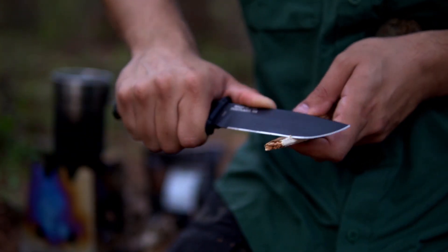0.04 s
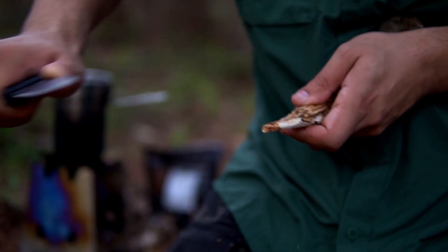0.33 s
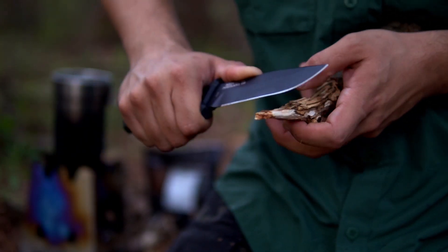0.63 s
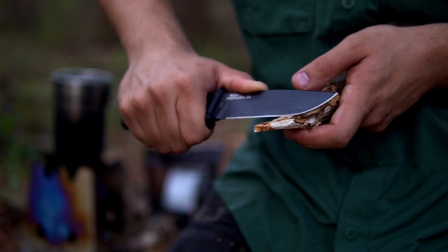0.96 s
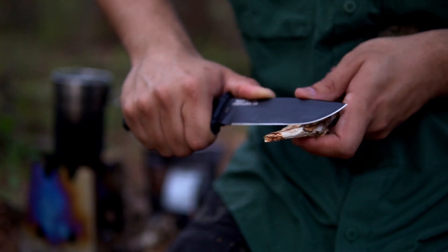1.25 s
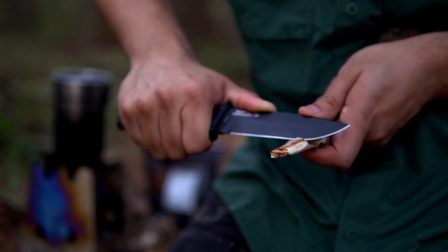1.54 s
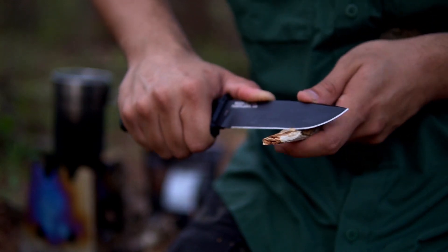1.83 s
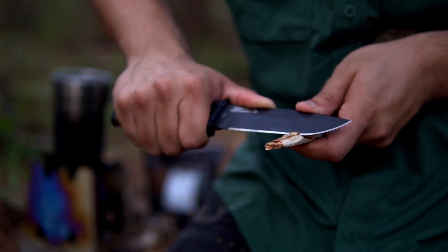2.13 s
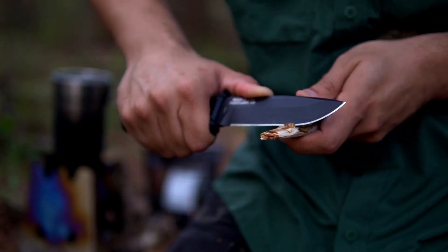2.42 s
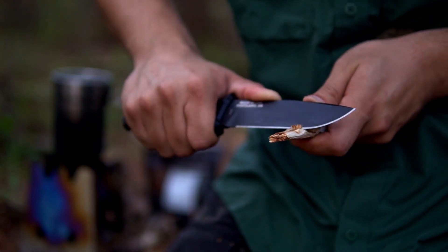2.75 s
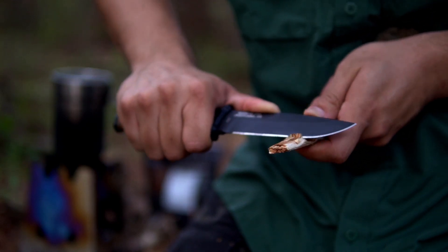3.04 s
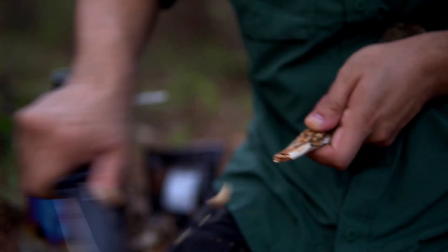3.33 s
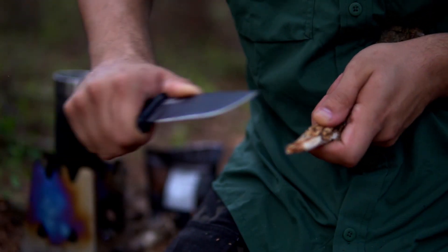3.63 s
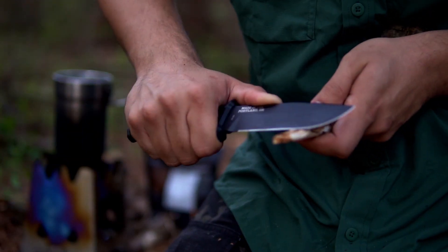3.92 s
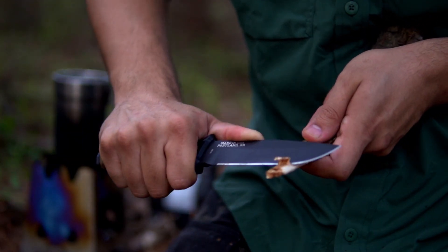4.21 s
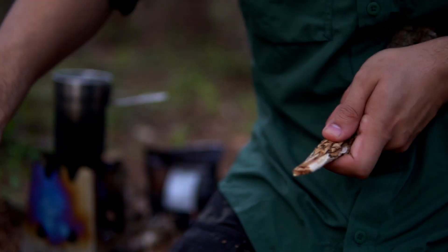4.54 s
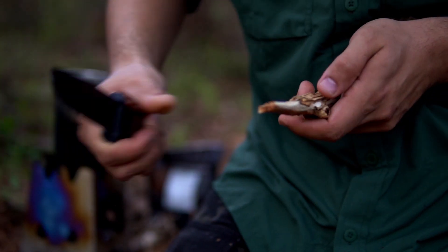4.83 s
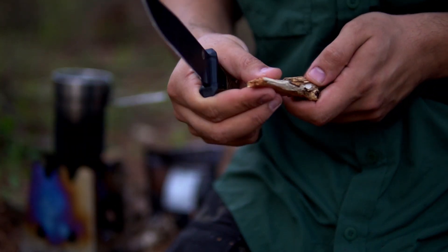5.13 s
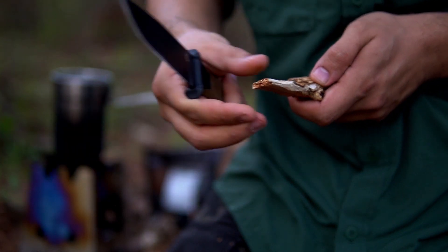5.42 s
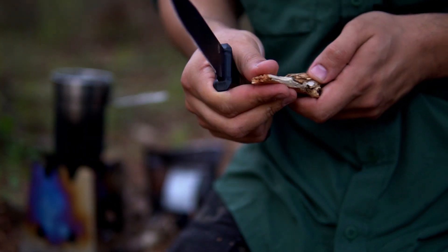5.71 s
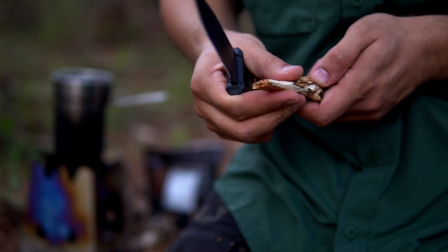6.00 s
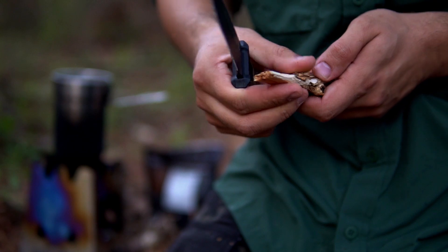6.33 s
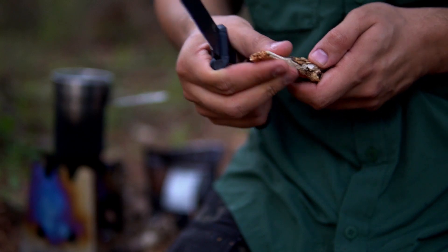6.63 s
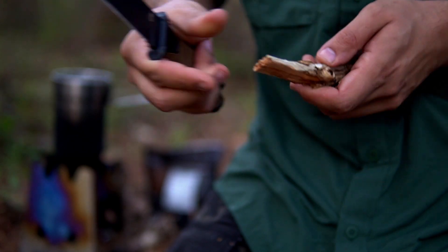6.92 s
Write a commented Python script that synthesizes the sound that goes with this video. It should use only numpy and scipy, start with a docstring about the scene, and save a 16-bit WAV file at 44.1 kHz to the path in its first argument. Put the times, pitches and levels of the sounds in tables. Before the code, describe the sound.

A knife whittles a dry stick up close, with sharp snaps, small creaks and scrapes, in quiet woodland with faint bird calls.

```python
"""A knife whittles a dry stick close by, over the low murmur of quiet woodland.
First the blade creaks, tears through the fibres and snaps off a splinter; a small bird calls thinly.
Then it slides over bark and wedges in with little squeaks and cracks. Three more cuts follow from 3.3 s,
the last the loudest, and loose chips tick down. From 5.2 s fingers rub the cut tip and the bird calls
once more. All along, the trees send back a soft echo."""
import sys
import numpy as np
from scipy import signal
from scipy.fft import rfft, irfft
from scipy.io import wavfile
from scipy.ndimage import uniform_filter1d

SR = 44100
rng = np.random.default_rng(int(sys.argv[2]) if len(sys.argv) > 2 else 0)


def to_wav(sig):
    """Store sig (one row per channel, or 1-D mono) as 16-bit WAV at the path in sys.argv[1].

    Samples outside -1..1 are clipped; the rate is SR.
    """
    pcm = np.clip(np.atleast_2d(sig), -1, 1) * 32767
    pcm = np.round(pcm).astype(np.int16)
    wavfile.write(sys.argv[1], SR, pcm.T)  # frames by channels


N = 306936

# Tone curves, how strong each frequency is next to the others: frequency_hz, gain_db
MURMUR_TONE = [(12, -54), (20, -30), (53, -4.5), (107, -3), (146, -7), (222, -12.5), (245, -13.5),
               (270, -12), (481, -9), (583, -12), (654, -11.5), (1210, -20), (1310, -22), (1780, -26.5),
               (2000, -28), (2600, -46.5), (4400, -120)]  # the far forest
AIR_TONE = [(1500, -20.5), (2300, -1.5), (2650, -0.5), (3050, 3), (3600, -0.5), (4400, 4), (5200, -4),
            (8000, -5.5), (15000, -10)]  # thin outdoor hiss
HISS_TONE = [(20, 23), (110, 1), (500, -11.5), (2500, -23), (5500, -2.5), (10000, 4), (16000, 3)]  # each channel's own noise
ECHO_TONE = [(200, -0.5), (900, 2.5), (1600, 0.5), (2400, -8), (3200, -7.5), (4500, -5), (7500, -2.5),
             (11000, -0.5), (15000, -0.5)]  # what the trees throw back
SKIN_TONE = [(2000, -12.5), (5500, -10), (6100, -6.5), (6700, 2), (7700, -9), (9500, -7.5), (11800, -9),
             (12500, -23), (15500, -32)]  # skin on wood
TIP_TONE = [(1500, -36), (2500, -20), (2900, -1), (3500, 2), (4000, -12), (4700, -9), (5600, -17.5),
            (12000, -31)]  # the splintered tip
BARK_TONE = [(1180, -29), (2000, -14), (2650, -18), (2820, -10), (3460, -8), (4250, 0.5), (4790, 3),
             (5540, -5), (6300, 0.5), (7110, -3.5), (8880, 1.5), (10500, -14.5), (15500, -33)]  # blade on bark
GRAIN_TONE = [(1180, -67), (2000, -14), (2500, -9.5), (2680, -1.5), (3180, 0.5), (3670, -3), (4630, 4.5),
              (5270, -4.5), (6360, 0), (7420, -8.5), (8290, -7), (11500, -13.5), (15500, -23.5)]  # bare wood
JOLT_TONE = [(60, -22.5), (200, 5.5), (450, 8), (800, -2.5), (1300, -9), (1700, -21), (4000, -25.5)]  # dull push of the wedged edge
SUPPLE_TONE = [(300, -58), (800, -30.5), (1400, -14.5), (1650, -15), (2020, -29.5), (2220, 0.5), (2480, -9),
               (2800, -21.5), (3800, -1), (4800, 1.5), (6000, -7), (7500, -9.5), (9800, -20.5),
               (11500, -14), (16000, -33.5)]  # bendy wood tearing
BRITTLE_TONE = [(200, -62.5), (1000, -12.5), (1600, -12), (2000, -28), (2600, 2), (3100, 4.5), (4000, -10),
                (5500, -13.5), (8000, -16), (12000, -22), (16000, -28)]  # brittle wood breaking
# How long the echo takes to fade by 60 dB: frequency_hz, fade_s
ECHO_FADE = [(200, 0.49), (1500, 0.36), (3500, 0.94), (8000, 0.8), (14000, 0.55)]

# Notes that ring in the wood, fading 60 dB in fade_s: pitch_hz, gain_db, fade_s
STICK_NOTES = [(466, -42, 0.018), (775, -10, 0.023), (903, 13.5, .022), (1040, -7, 0.013),
               (1413, -8, 0.055)]  # the stick, before the hand's grip lowers its pitch
SHAVING_NOTES = [(2282, 6, 0.039), (2520, -8, 0.029), (4580, 4, 0.016)]  # a bendy curl still attached
# Notes of the wedged blade: times_squeak_pitch, gain_db, fade_s
BLADE_NOTES = [(.49, -8, 0.0075), (.70, -16, 0.017), (.85, -8, .015), (1, 11, 0.013), (1.22, -28, .012),
               (1.85, -27, .005)]

# Thin bird calls: start_s, length_s, level_before_mix_db, opening_pitch_hz
BIRD_CALLS = [(.34, .15, -49.5, 8780), (0.842, .07, -60.5, 7650), (6.548, 0.074, -56, 8600)]
# Rubbing strokes: start_s, length_s, level_db, growth_db_per_s
FINGER_RUBS = [(5.219, .037, -46.5, 33), (6.667, .118, -45.5, -37), (6.91, .045, -52, -40)]
BARK_SLIDES = [(.62, 0.028, -40.5, 30), (.688, 0.05, -46.5, 115), (1.775, .05, -59.5, -38)]
WOOD_SCRAPES = [(1.047, 0.059, -41, -68)]
# Dry flakes flick off: time_s, level_db, rise_and_fall_s
BARK_FLAKES = [(0.605, -39, .0009), (0.999, -52, .0025), (5.694, -52, 0.0062), (5.732, -50, 0.0033),
               (5.771, -47.5, 0.0039), (6.165, -52, .0055), (6.759, -38, 0.0031), (6.776, -36.5, 0.0027),
               (6.9286, -38.5, .0018)]
# Light wooden ticks, as a chip lands or the splintered tip flicks off a finger: time_s, level_db
WOOD_TICKS = [(3.613, -45.5), (4.6095, -18.5), (4.7163, -41), (6.791, -36)]
# The edge wedges deeper: time_s, level_db, squeak_pitch_hz
BLADE_CREAKS = [(.128, -31.5, 4700), (1.524, -42, 6470), (1.5731, -38.5, 6550), (1.585, -44, 6700),
                (2.014, -52, 6000), (2.2583, -37, 5580), (2.26, -38.5, 7340), (3.098, -38, 6040),
                (3.1757, -34, 6380)]
# Lone cracks between cuts: time_s, level_db, knock_offset_db (an offset is added to level_db)
LONE_CRACKS = [(1.0301, -33, -14), (2.2598, -41, 11), (2.6958, -43, -1), (3.1763, -31.5, -12),
               (3.8966, -44.5, 12.5)]
# A splinter lets go: start_s, level_db, pitch_hz, swell_s, bend_offset_db
SPLINTER_SNAPS = [(0.1685, -15.5, 3300, 0.00053, -15), (3.333, -0.5, 3390, 0.00049, -47),
                  (3.344, -14, 3150, .0004, -15), (4.467, 0, 2950, 0.00036, -7.5),
                  (4.474, 0, 3150, 0.00037, -12)]
# The knife tears through: start_s, length_s, level_db, brittleness_0_to_1, run_up_s, catch_before_s,
# strand_after_s, bite_offset_db, grip_pitch_factor, spring_back_offset_db
KNIFE_CUTS = [(0.1522, .006, -16.5, 0.26, .11, .0065, 0.0081, -8, 0.57, -8),
              (3.329, .009, -19, 0.71, .04, 0.0072, 0.0021, -15.5, 0.3, -27),
              (4.134, .0055, -18.5, 0.49, 0.05, .0147, .024, -7, .8, -3),
              (4.4663, .0025, -9, .62, 0.033, 0.0018, .003, -22, .7, -18.5)]


def amp(db):
    """Turns decibels into a number to multiply by."""
    return 10 ** (np.asarray(db) / 20)


def unit(x):
    """Scales a sound to an average strength (rms) of 1."""
    return x / np.sqrt(np.mean(x ** 2) + 1e-20)


def read(curve, hz):
    """Looks up a curve between its points, spacing frequencies by octaves."""
    points_hz, values = np.transpose(curve)
    return np.interp(np.log(hz + 1), np.log(points_hz + 1), values)


def add(mix, start_s, sound):
    """Mixes a sound in at the given time."""
    part = mix[max(round(start_s * SR), 0):][:len(sound)]
    part += sound[:len(part)]


def bins(x):
    """Lists the frequencies in a sound's spectrum."""
    return np.fft.rfftfreq(len(x), 1 / SR)


def colour(x, tone, other_tone=None, blend=0):
    """Filters a sound with one tone curve, or a blend of two."""
    gain_db = read(tone, bins(x))
    if blend:
        gain_db = (1 - blend) * gain_db + blend * read(other_tone, bins(x))
    cepstrum = irfft(np.log(amp(gain_db)), len(x))
    cepstrum[1:] *= 2 * (np.arange(1, len(x)) < len(x) / 2)  # ring after each click, not before
    return irfft(rfft(x) * np.exp(rfft(cepstrum)), len(x))


def ring(x, notes, pitch_scale=1):
    """Lets each click set off a few fading notes."""
    t = np.arange(len(x)) / SR
    ringing = sum(amp(db - 60 * t / fade_s) * np.sin(2 * np.pi * hz * pitch_scale * t)
                  for hz, db, fade_s in notes)
    return signal.fftconvolve(x, ringing)[:len(x)]


def fibres(samples, per_s, spread_db):
    """Tiny breaks click at random moments with uneven strength."""
    chance, strength, sign = rng.random((3, samples))
    size = np.minimum(-np.log(1 - strength), np.pi)
    return (chance < per_s / SR) * amp(spread_db * size) * np.sign(sign - .5)


def burst(rise_s, fall_s, hold_s=0, samples=4096):
    """Gives a loudness shape that jumps up, holds and dies, and the time it reaches its peak."""
    t = (np.arange(samples) - samples // 2) / SR
    shape = np.exp(-(np.maximum(-t, 0) / rise_s) ** 1.3 - np.maximum(t - hold_s, 0) / fall_s)
    return shape, samples / 2 / SR


def sized(x, shape, db):
    """Gives a sound the energy of a loudness shape that peaks at db."""
    return amp(db) * unit(x) * np.sqrt(np.mean(shape ** 2))


def forest(murmur_db=-50, swell_db=0.53, drone_hz=119, drone_db=-60, air_db=-59.5):
    """A low, far murmur and a faint wavering drone lie under a thin, high hiss."""
    low, high, waver = rng.standard_normal((3, N))
    t = np.arange(N) / SR
    swell = unit(sum(np.sin(2 * np.pi * (hz * t + rng.random())) / np.sqrt(hz)
                     for hz in np.geomspace(.3, 6, 20)))
    murmur = amp(murmur_db + swell_db * swell) * unit(colour(low, MURMUR_TONE))
    narrow_band = 1 / (1 + ((bins(waver) - drone_hz) / 6) ** 2)
    drone = amp(drone_db) * unit(irfft(rfft(waver) * narrow_band, N))
    return murmur + drone + amp(air_db) * unit(colour(high, AIR_TONE))


def echo_tail(echoes_per_s=4000, build_s=0.0096):
    """Scattered echoes build up, then each frequency fades at its own speed."""
    taps = rng.standard_normal(SR) * (rng.random(SR) < echoes_per_s / SR)
    hz, t, spectrum = signal.stft(taps, SR, nperseg=256)
    fade = amp(read(ECHO_TONE, hz)[:, None] - 60 * t / read(ECHO_FADE, hz)[:, None])
    build = 1 - 0.16 * np.exp(-t / build_s)
    echoes = signal.istft(spectrum * fade * build, SR, nperseg=256)[1]
    return echoes / np.linalg.norm(echoes)


def woodland_echo(x, tails=5, switches_per_s=500):
    """A soft, spread-out echo; the sound cycles quickly through random tails to keep it smooth."""
    turn = np.arange(N) / SR * switches_per_s
    crossfades = (np.sin(np.pi / 2 * np.minimum((turn - k) % tails, 2)) for k in range(tails))
    return sum(signal.fftconvolve(x * fade, echo_tail())[:N] for fade in crossfades)


def bird(end_hz=7800, glide_s=0.023, waver=0.0239, trill_hz=29, trill=0.024, fade_db_per_s=26):
    """A high, unsteady whistle glides to its closing pitch with a shallow trill."""
    out = np.zeros(N)
    unsteady = unit(uniform_filter1d(rng.standard_normal(N), size=60))
    for start_s, length_s, db, opening_hz in BIRD_CALLS:
        t = np.arange(0, length_s, 1 / SR)
        glide = end_hz + (opening_hz - end_hz) * np.exp(-(t / glide_s) ** 2)
        pitch = glide * (1 + waver * unsteady[:len(t)] + trill * np.sin(2 * np.pi * trill_hz * t))
        whistle = unit(np.sin(2 * np.pi * np.cumsum(pitch) / SR))
        add(out, start_s, whistle * amp(db - fade_db_per_s * t) * signal.windows.tukey(len(t), .15))
    return out


def friction(strokes, tone, rise_s, fall_s, per_s, spread_db):
    """Rubbing is many tiny catches; each stroke leans in, grows or eases, and lets go."""
    t, pressure = np.arange(N) / SR, np.zeros(N)
    for start_s, length_s, db, growth in strokes:
        age = t - start_s
        fades = np.exp(np.minimum(age, 0) / rise_s - np.maximum(age - length_s, 0) / fall_s)
        pressure += amp(db + growth * np.clip(age, 0, length_s)) * fades
    return pressure * unit(colour(fibres(N, per_s, spread_db), tone))


def fingers(rise_s=0.03, fall_s=0.021, rasp_offset_db=-9.5, rasp_db_per_s=107):
    """Skin hisses along the stick and makes the splintered tip rasp more as each rub goes on."""
    rasps = [(start_s, length_s, db + rasp_offset_db, growth + rasp_db_per_s)
             for start_s, length_s, db, growth in FINGER_RUBS]
    skin = friction(FINGER_RUBS, SKIN_TONE, rise_s, fall_s, per_s=11000, spread_db=7)
    return skin + friction(rasps, TIP_TONE, rise_s, fall_s, per_s=2800, spread_db=2.5)


def flakes(pick_from_s=5.62, pick_to_s=6, picks=2, pick_db=-62):
    """Crumbs of bark break off under edge and thumb, finer ones as the thumb picks at the tip."""
    out = np.zeros(N)
    picking = [(pick_from_s + (pick_to_s - pick_from_s) * when, pick_db + 3 * (1 - 2 * softness), .004)
               for when, softness in rng.random((picks, 2))]
    for time_s, db, width_s in BARK_FLAKES + picking:
        shape, peak_s = burst(width_s, width_s)
        crumbs = shape * fibres(len(shape), per_s=5000, spread_db=-1)
        add(out, time_s - peak_s, sized(colour(crumbs, GRAIN_TONE, SKIN_TONE, blend=.5), shape, db))
    return out


def blade(rise_s=0.013, fall_s=.016, run_up_end_db=-48.5, lean_db_per_s=92):
    """The flat slides over bark; the edge scrapes bare wood, also as the hand leans into each cut."""
    run_ups = [(cut_s - lead_s, lead_s, run_up_end_db - lean_db_per_s * lead_s, lean_db_per_s)
               for cut_s, _, _, _, lead_s, *_ in KNIFE_CUTS]
    flat = friction(BARK_SLIDES, BARK_TONE, rise_s, fall_s, per_s=7800, spread_db=4)
    edge = friction(WOOD_SCRAPES + run_ups, GRAIN_TONE, rise_s, fall_s, per_s=3300, spread_db=2.5)
    return flat + edge


def wood_ticks(rise_s=0.00027, skitter_offset_db=-19):
    """A chip lands or the splintered tip flicks off a finger: a light tick, then a brief skitter."""
    out = np.zeros(N)
    tick, peak_s = burst(rise_s, fall_s=0.001)
    skitter, _ = burst(rise_s, fall_s=0.0079)
    shape = tick + amp(skitter_offset_db) * skitter
    for time_s, db in WOOD_TICKS:
        taps = shape * fibres(len(shape), per_s=9800, spread_db=3)
        add(out, time_s - peak_s, sized(colour(taps, GRAIN_TONE), shape, db))
    return out


def creaks():
    """The wedged blade sticks and slips quickly, so it squeaks and gives the wood a dull jolt."""
    out = np.zeros(N)
    shape, peak_s = burst(rise_s=0.0025, fall_s=0.0025)
    for time_s, db, pitch_hz in BLADE_CREAKS:
        slips = shape * fibres(len(shape), per_s=3700, spread_db=1)
        squeak = sized(ring(slips, BLADE_NOTES, pitch_hz), shape, db)
        grit = sized(colour(slips, GRAIN_TONE), shape, db - 3)
        jolt = sized(colour(slips, JOLT_TONE), shape, db - 7)
        add(out, time_s - peak_s, squeak + grit + jolt)
    return out


def thin_stick(x, cutoff_hz=150):
    """A thin stick moves too little air to make deep bass."""
    return signal.sosfilt(signal.butter(2, cutoff_hz, "high", fs=SR, output="sos"), x)


def recoil(notes, shape, db, grip=1, lead_s=0.001008):
    """The wood springs back just before a break peaks and rings briefly; grip scales its pitch."""
    kick = signal.unit_impulse(len(shape), len(shape) // 2 - round(lead_s * SR))
    return sized(ring(kick, notes, grip), shape, db)


def tear(shape, db, brittleness):
    """Fibres part in a rush; the bendier the wood, the more the attached shaving rings."""
    breaks = shape * fibres(len(shape), per_s=12000, spread_db=3)
    crack = sized(colour(breaks, SUPPLE_TONE, BRITTLE_TONE, blend=brittleness), shape, db)
    return crack + (1 - brittleness) ** 2 * recoil(SHAVING_NOTES, shape, db - 3)


def cracks():
    """One small bundle of fibres gives way and knocks the stick."""
    out = np.zeros(N)
    shape, peak_s = burst(rise_s=0.00071, fall_s=0.00154)
    for time_s, db, knock_offset_db in LONE_CRACKS:
        knock = recoil(STICK_NOTES, shape, db + knock_offset_db, grip=.78)
        add(out, time_s - peak_s, tear(shape, db, brittleness=0.58) + knock)
    return out


def snaps(bend_hz=1620, bend_s=0.00066, grit_offset_db=-11):
    """A splinter whips to and fro with a gritty edge; the stick's slower bending follows."""
    out, t = np.zeros(N), np.arange(1024) / SR
    for start_s, db, pitch_hz, swell_s, bend_offset_db in SPLINTER_SNAPS:
        shape = (t / swell_s * np.exp(1 - t / swell_s)) ** 2
        whip = shape * np.sin(2 * np.pi * pitch_hz * t)
        grit = amp(grit_offset_db) * shape * unit(colour(rng.standard_normal(len(t)), BRITTLE_TONE))
        bend_shape = t / bend_s * np.exp(1 - t / bend_s)
        bend = amp(bend_offset_db) * bend_shape * np.sin(2 * np.pi * bend_hz * t)
        add(out, start_s, amp(db) * (whip + grit + bend))
    return out


def cuts(push_db=-37, catch_db=-27, catch_s=0.0027, strand_db=-23, strand_s=.0015):
    """The edge catches, bites and tears a shaving free; the stick springs back; a last strand parts."""
    out = np.zeros(N)
    for start_s, length_s, db, brittleness, _, before_s, after_s, bite_db, grip, back_db in KNIFE_CUTS:
        end_s = start_s + length_s
        shape, peak_s = burst(rise_s=0.0024, fall_s=.0018, hold_s=length_s)
        shoves = shape * rng.standard_normal(len(shape))
        push = sized(colour(shoves, JOLT_TONE), shape, push_db)
        bite = recoil(STICK_NOTES, shape, db + bite_db, grip)
        add(out, start_s - peak_s, tear(shape, db, brittleness) + push + bite)
        spring_back = recoil(STICK_NOTES, shape, db + back_db, grip=0.96, lead_s=0.00197)
        add(out, end_s - peak_s, spring_back)
        first_catch = (start_s - before_s, catch_db, catch_s)
        last_strand = (end_s + after_s, strand_db, strand_s)
        for time_s, tick_db, width_s in first_catch, last_strand:
            shape, peak_s = burst(width_s, width_s)
            knock = recoil(STICK_NOTES, shape, tick_db - 9, grip=.8)
            add(out, time_s - peak_s, tear(shape, tick_db, brittleness) + knock)
    return out


def scene():
    """The knife is close, with little echo, and the bird farther off; both channels are the same."""
    torn = thin_stick(cuts() + cracks() + wood_ticks())
    snapped = thin_stick(snaps())
    calls = bird()
    handling = blade() + fingers() + flakes()
    squeaks = creaks()
    echoes = woodland_echo(amp(-16.5) * torn + amp(-21.5) * snapped + amp(-14.5) * handling
                           + amp(-10.5) * squeaks + amp(-5) * calls)
    mono = torn + snapped + handling + squeaks + amp(-1) * calls + echoes + forest()
    return np.array([mono, mono])


def record(dry, hiss_db=-68, top_hz=15850):
    """Adds faint hiss to each channel, clips the hardest snaps and removes the highest treble."""
    hiss = np.array([unit(colour(noise, HISS_TONE)) for noise in rng.standard_normal(dry.shape)])
    clipped = np.clip(dry + amp(hiss_db) * hiss, -1, 1)
    low_pass = signal.firwin(511, top_hz, window=("kaiser", 9), fs=SR)
    return signal.oaconvolve(clipped, low_pass[None], "same", axes=1)


dry = scene()
out = record(dry)
to_wav(out)
```